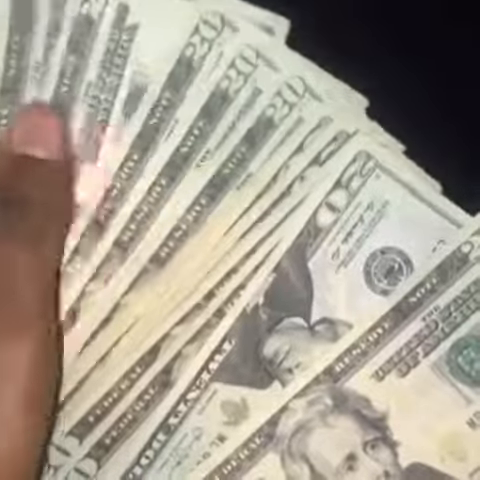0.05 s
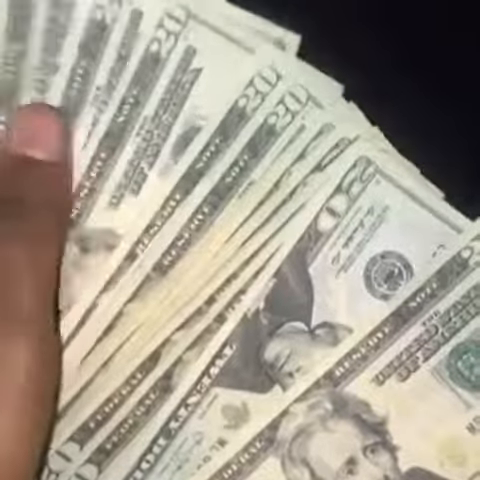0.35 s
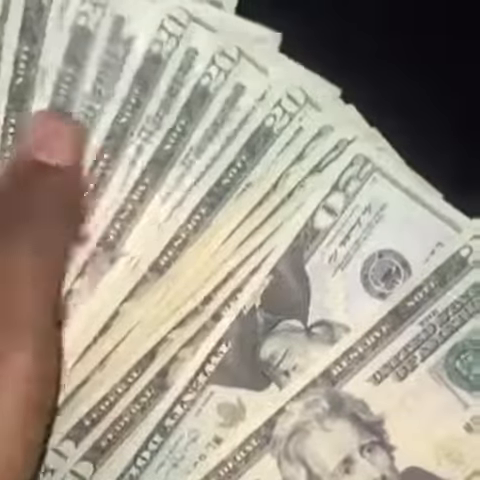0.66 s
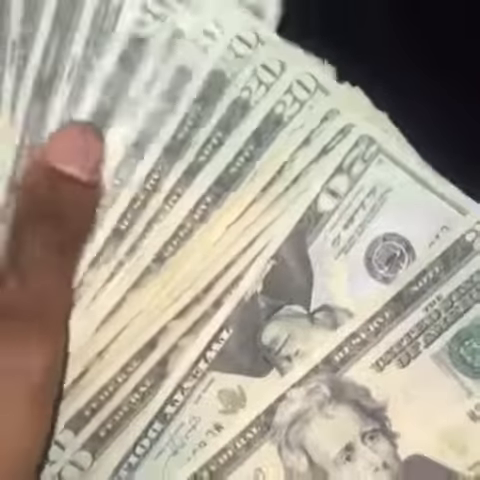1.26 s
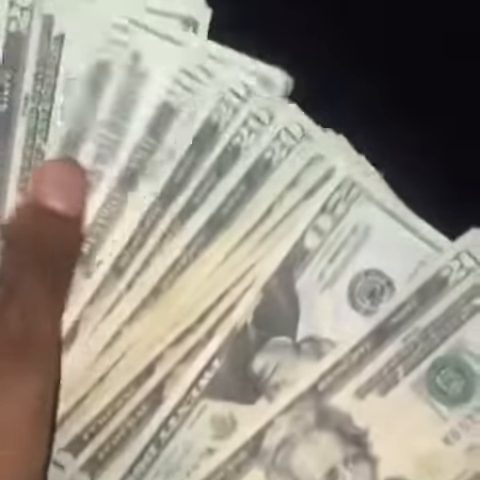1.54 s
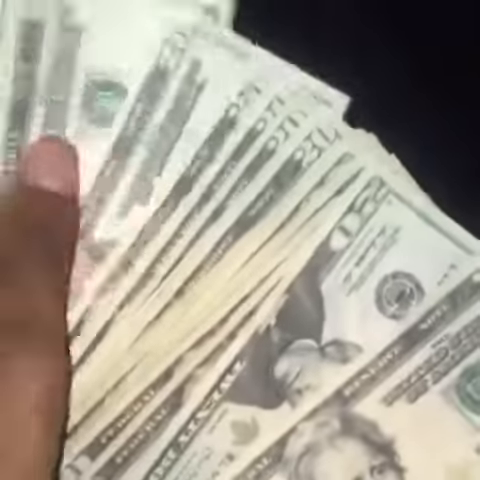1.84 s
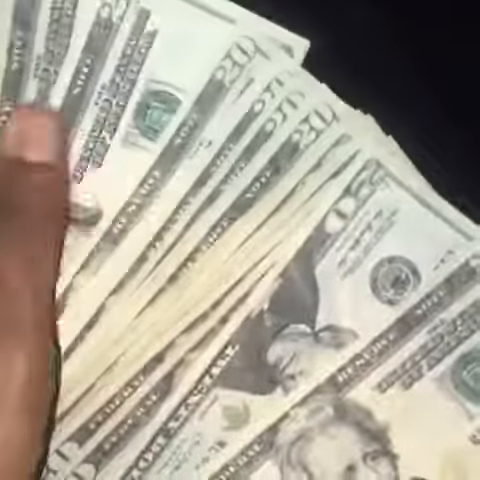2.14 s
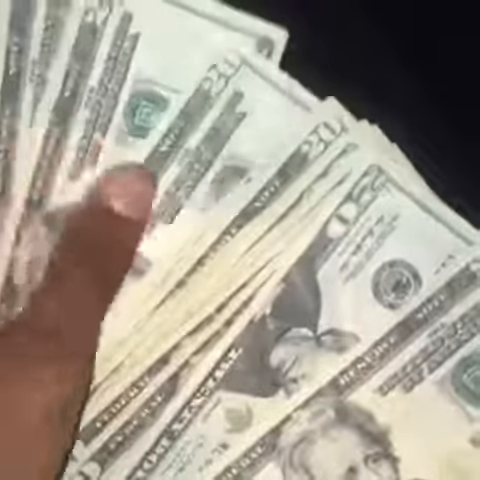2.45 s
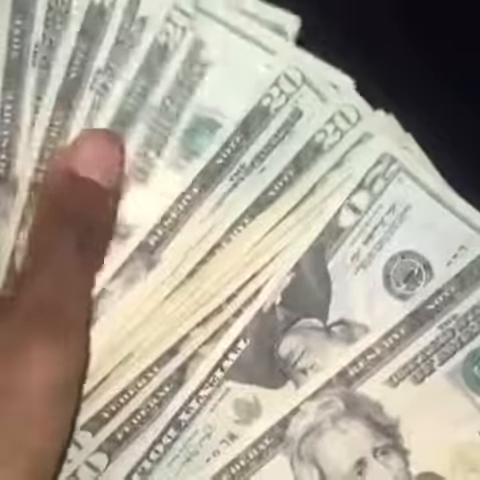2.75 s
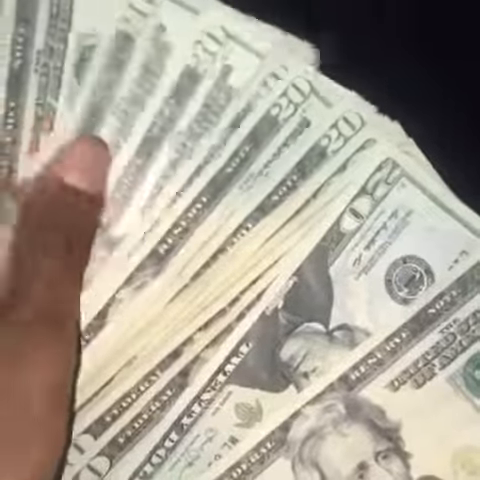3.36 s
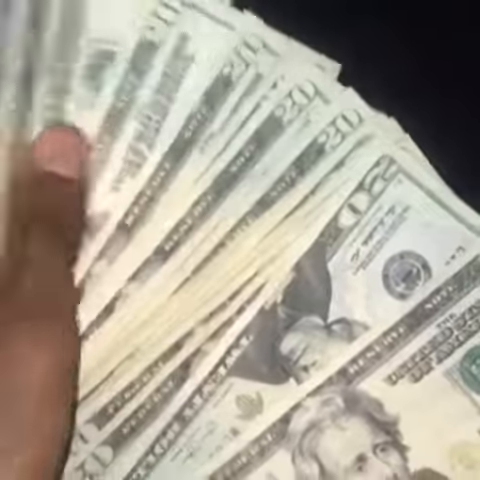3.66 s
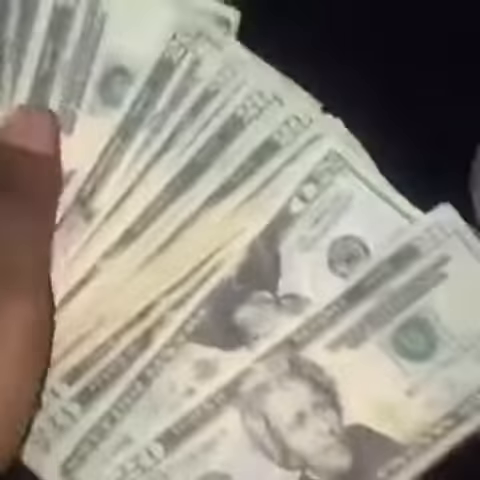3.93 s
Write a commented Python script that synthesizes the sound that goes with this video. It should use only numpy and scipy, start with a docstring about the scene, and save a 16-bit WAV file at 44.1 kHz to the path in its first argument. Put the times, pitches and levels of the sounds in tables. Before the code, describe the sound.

A thumb softly swishes through paper bills over the low rumble of an idling vehicle.

```python
"""Thumbing bills in an idling vehicle

A thumb strokes to and fro over a fan of paper bills, each stroke a soft, grainy swish of friction.
A few bill edges snap free, and something gives a brief cluster of thin squeaks. The engine repeats
one pattern every turn and booms in the cabin, over a dull rush of air and a faint hiss."""
import sys
import numpy as np
from scipy import signal
from scipy.fft import rfft, irfft
from scipy.io import wavfile

SR = 44100
rng = np.random.default_rng(int(sys.argv[2]) if len(sys.argv) > 2 else 0)


def bounce(signal):
    """Save signal as a 16-bit WAV file at the path given by the first command-line argument."""
    frames = np.transpose(np.atleast_2d(signal))
    limited = np.clip(frames, -1, 1)
    pcm = np.round(limited * 32767).astype(np.int16)
    wavfile.write(sys.argv[1], SR, pcm)


N = 176400
TIME = np.arange(N) / SR

# idle speed, sagging slightly: t/s, speed/rpm
IDLE_SPEED = [(0, 551.2), (1.3, 552.0), (2.1, 549.9), (2.8, 547.8), (3.3, 544.8), (4, 543.3)]
# rush of air and exhaust in the cabin: f/Hz, level/dB per Hz
AIR_SPECTRUM = [(25, -99), (50, -94), (68, -78), (85, -70), (120, -63), (175, -58), (240, -62), (310, -56),
                (355, -64.5), (520, -63.5), (600, -69.5), (720, -73), (790, -68.5), (860, -68), (960, -67),
                (1050, -69.5), (1090, -75.5), (1160, -71), (1330, -76.5), (1430, -74.5), (1560, -80.5),
                (1680, -79), (2050, -83.5), (2700, -95), (3700, -110), (6000, -130)]


def from_db(db):
    """Decibels to gain."""
    return 10 ** (np.asarray(db) / 20)


def unit_power(x):
    """Scale to an RMS of one."""
    return x / np.sqrt(np.mean(x ** 2) + 1e-20)


def automation(rows):
    """One curve for each column after the time, sample by sample."""
    times, *columns = np.transpose(rows)
    return [np.interp(TIME, times, column) for column in columns]


def level_at(spectrum, hz):
    """Read a spectrum's dB on a log-frequency axis."""
    points_hz, db = np.transpose(spectrum)
    return np.interp(np.log(np.maximum(hz, 1)), np.log(points_hz), db)


def coloured(noise, spectrum):
    """Give unit white noise a spectrum in dB per Hz."""
    gains = from_db(level_at(spectrum, np.fft.rfftfreq(N, 1 / SR)))
    return irfft(rfft(noise) * gains, N) * np.sqrt(SR / 2)


def drift(rate_hz):
    """Smooth random modulation with an RMS of about one."""
    hop, settle = 40, 2000
    pole = np.exp(-2 * np.pi * hop * rate_hz / SR)
    noise = rng.standard_normal(N // hop + settle + 2)
    slow = signal.lfilter([1], [1, -2 * pole, pole * pole], noise)[settle:]
    return np.interp(np.arange(N) / hop, np.arange(len(slow)), unit_power(slow))


def band_noise(low_hz, high_hz):
    """Noise between two steep edges, at unit power."""
    bandpass = signal.butter(4, [low_hz, high_hz], "band", fs=SR, output="sos")
    return unit_power(signal.sosfilt(bandpass, rng.standard_normal(N)))


def thumb_strokes():
    """Paper slides on paper, louder as the thumb speeds up; catching fibres add a grain of tiny clicks."""
    # strokes: start/s, rise/s, fall/s, level/dB, body against treble/dB
    strokes = [(.128, .022, .05, -56.5, 0), (.183, 0.061, .048, -57, 1), (.32, .04, .03, -60.5, -5),
               (.43, 0.12, 0.075, -57.5, -0.5), (.775, .115, .06, -58.5, 1.5), (1.145, .1, 0.05, -55, 0),
               (1.525, 0.043, 0.12, -56.5, -1), (1.852, .118, 0.056, -53, 0), (2.285, .12, 0.08, -52, 0),
               (2.625, 0.032, .09, -56, 0.5), (2.665, 0.066, 0.12, -58, -.5),
               (2.955, 0.039, 0.074, -55.5, 4.5), (3.038, 0.062, 0.037, -55.5, -3),
               (3.31, 0.072, 0.088, -55, 3), (3.63, 0.15, .25, -61, 0)]
    # colour of sliding paper: f/Hz, relative level/dB
    paper_spectrum = [(800, 11), (2200, -3), (3200, 3), (3900, -0.5), (4500, 4.5), (5100, 0.5),
                      (6300, -3.5), (7200, 0.5), (8500, 1.5), (10300, 3), (13000, -1), (14500, -10),
                      (15800, -17)]
    grains_per_s, grain_spread_db, grain_share = 900, 3, 0.2
    flutter_db, body_top_hz = 1.3, 5760
    treble_power, body_power = np.zeros((2, N))
    for start, rise, fall, db, body_db in strokes:
        speed = np.interp(TIME, [start, start + rise, start + rise + fall], [0, 1, 0])
        level = from_db(db) * speed ** 0.7
        treble_power += level ** 2
        body_power += (level * from_db(body_db)) ** 2
    sizes = from_db(grain_spread_db * np.minimum(rng.exponential(1, N), 5))
    signs = rng.choice([-1, 1], N)
    grains = unit_power(sizes * signs * (rng.random(N) < grains_per_s / SR))
    friction = np.sqrt(grain_share) * grains + np.sqrt(1 - grain_share) * rng.standard_normal(N)
    paper = unit_power(coloured(friction, paper_spectrum)) * from_db(flutter_db * drift(rate_hz=27))
    body = signal.sosfiltfilt(signal.butter(2, body_top_hz, fs=SR, output="sos"), paper)
    return body * np.sqrt(body_power) + (paper - body) * np.sqrt(treble_power)


def edge_snaps():
    """A bill's edge flicks free: a very short crack with a colour of its own."""
    # snaps: t/s, relative level/dB, low edge/Hz, high edge/Hz, tilt/dB per octave, decay/s
    snaps = [(1.1595, -42, 3000, 13500, -3, 0.002), (1.2365, -42, 5000, 15000, 4, .002),
             (1.246, -45, 4000, 12000, -4, .005), (1.3305, -41, 1500, 6000, -4, .001),
             (1.346, -36, 8000, 15600, 4, .0006), (1.368, -42, 11500, 12700, 0, .0015),
             (1.896, -43, 2900, 4000, -6, 0.0027), (3.258, -26, 614, 4600, -12, 0.0037),
             (3.297, -41, 500, 7500, -5, .001), (3.3257, -27.5, 4000, 9200, 2.5, 0.00069),
             (3.3262, -27.5, 700, 5200, -9.5, 0.0076), (3.513, -48.5, 4500, 6500, 0, 0.0014)]
    attack_s = 0.00014
    out = np.zeros(N)
    for start, db, low_hz, high_hz, tilt_db, decay in snaps:
        age = np.maximum(TIME - start, 0)
        envelope = (1 - np.exp(-age / attack_s)) * np.exp(-age / decay)
        tilt = [(low_hz, 0), (high_hz, tilt_db * np.log2(high_hz / low_hz))]
        crack = unit_power(coloured(band_noise(low_hz, high_hz), tilt))
        out += from_db(db) / 2 * envelope * crack
    return out


def squeaks():
    """Thin gliding whistles that swell and fade: weak ones rasp, loud ones catch and sound purer."""
    # one short cluster: start/s, length/s, first f/Hz, last f/Hz, level/dB
    glides = [(.38, .09, 11800, 12700, -73), (.572, .04, 12600, 15100, -76), (.58, 0.13, 7600, 7380, -73),
              (0.599, 0.037, 12700, 11900, -64), (.605, .07, 15200, 14850, -76),
              (0.637, 0.083, 11800, 11770, -60), (.705, .09, 14600, 12000, -68),
              (0.738, .032, 11550, 11150, -67), (0.743, .04, 7250, 6950, -71)]
    jitter_depth, steady_above_db, flutter_db = 0.024, -62, 3
    out, jitter = np.zeros(N), drift(rate_hz=300)
    for start, length, first_hz, last_hz, db in glides:
        progress = np.clip((TIME - start) / length, 0, 1)
        rasp = jitter_depth / (1 + from_db(db - steady_above_db) ** 2)
        hz = (first_hz + (last_hz - first_hz) * progress) * (1 + rasp * jitter)
        arch = 2 * np.sqrt(progress * (1 - progress))
        out += np.sqrt(2) * from_db(db) * arch * np.sin(2 * np.pi * np.cumsum(hz) / SR)
    return out * from_db(flutter_db * drift(rate_hz=60))


def engine():
    """Wavering orders (multiples of the turning rate); returns their drone and the one that booms."""
    # orders that the cabin brings out: f/turning rate
    strong_orders = [10, 13, 16, 18, 19, 20, 21, 22, 24, 26, 27, 28, 29, 30, 31, 33, 34, 36, 56, 57, 86,
                     102]
    # strength of each of those orders: level/dB
    strong_db = [-56, -50, -45.5, -43.5, -47, -45, -40.5, -44, -39.5, -47, -44, -44, -55.5, -43.5, -46,
                 -49.5, -52, -52, -55, -52, -52, -50]
    # swell and ebb of the boom, the strongest hum: t/s, level/dB
    boom_curve = [(0, -42), (.35, -33.5), (.68, -36.5), (.85, -36), (1.33, -31), (1.5, -41.5),
                  (1.75, -33.5), (2.0, -31), (2.3, -33), (2.53, -35), (2.8, -33.5), (3.45, -37),
                  (3.65, -34), (4, -36)]
    boom_order, weak_over_air_db, wobble_db = 32, 3.5, 1.32
    lump_db, lumpy_below_order = 2.5, 23
    rpm, = automation(IDLE_SPEED)
    boom_db, = automation(boom_curve)
    angle = 2 * np.pi * np.cumsum(rpm) / 60 / SR
    turn_hz = np.mean(np.array(IDLE_SPEED)[:, 1]) / 60
    strong = dict(zip(strong_orders, strong_db))
    strong[boom_order] = boom_db.mean()
    orders = np.arange(8, 116)
    weak_db = level_at(AIR_SPECTRUM, orders * turn_hz) + weak_over_air_db
    gains = from_db([strong.get(order, db) for order, db in zip(orders, weak_db)])
    # uneven firing makes the low orders come in lumps
    lumps = unit_power(from_db(lump_db * np.clip(drift(rate_hz=13.7), -2, 1)))
    drone = np.zeros(N)
    for order, gain, phase in zip(orders, gains, even_phases(orders, gains)):
        wobble = from_db(wobble_db * drift(rate_hz=1.8))
        tone = np.sqrt(2) * np.sin(order * angle + phase) * wobble
        if order < lumpy_below_order:
            tone *= lumps
        if order == boom_order:
            boom = from_db(boom_db) * tone
        else:
            drone += gain * tone
    return drone, boom


def even_phases(orders, gains):
    """Random phases, nudged so that the engine's loudest octave spreads more evenly round a turn."""
    phases = rng.uniform(0, 2 * np.pi, len(orders))
    loud = (orders >= 22) & (orders < 39)
    one_turn = np.linspace(0, 2 * np.pi, 256, endpoint=False)
    waves = np.exp(1j * np.outer(one_turn, orders[loud]))
    pattern = waves @ (gains[loud] * np.exp(1j * phases[loud]))
    flattened = np.exp(1j * np.angle(pattern))
    phases[loud] = np.angle(flattened @ waves.conj())
    return phases


def cabin_rumble():
    """Engine drone and rushing air swell once, then ease as the idle slows; the boom rides on top."""
    air = coloured(rng.standard_normal(N), AIR_SPECTRUM)
    drone, boom = engine()
    swell_at_s, swell_width_s = 1.257, 0.092
    swell_db = 2.0 * np.exp(-((TIME - swell_at_s) / swell_width_s) ** 2)
    ease_db = 0.1 * np.maximum(TIME - 2, 0)
    return (drone + air) * from_db(swell_db - ease_db) + boom


def hiss():
    """A steady bed of treble, and a faint whistling band that comes, wavers upward and goes."""
    # steady hiss: f/Hz, level/dB per Hz
    bed_spectrum = [(2000, -107), (3500, -106), (4500, -105), (6000, -108), (7300, -107), (8500, -110),
                    (11800, -111), (13500, -117), (15000, -128)]
    # whistling band: t/s, centre f/Hz, level/dB
    whistle_path = [(1.6, 6800, -89), (1.72, 6850, -73), (2.08, 7080, -83), (2.3, 7130, -82),
                    (2.55, 7300, -77), (2.93, 7200, -71), (3.17, 7300, -95)]
    width_hz = 640
    centre_hz, db = automation(whistle_path)
    phase = 2 * np.pi * np.cumsum(centre_hz) / SR
    lowpass = signal.butter(2, width_hz / 2, fs=SR, output="sos")
    spread = signal.sosfilt(lowpass, rng.standard_normal((2, N)))
    whistle = unit_power(spread[0] * np.cos(phase) + spread[1] * np.sin(phase))
    return coloured(rng.standard_normal(N), bed_spectrum) + from_db(db) * whistle


def scene():
    """A mono mix of the cabin bed, the bills and the squeaks."""
    return (cabin_rumble() + hiss() + thumb_strokes() + edge_snaps() + squeaks())[None]


def record(dry):
    """A steep high cut takes off the very top."""
    cutoff_hz = 15800
    return signal.sosfilt(signal.ellip(10, .2, 80, cutoff_hz, fs=SR, output="sos"), dry)


dry = scene()
out = record(dry)
bounce(out)
```